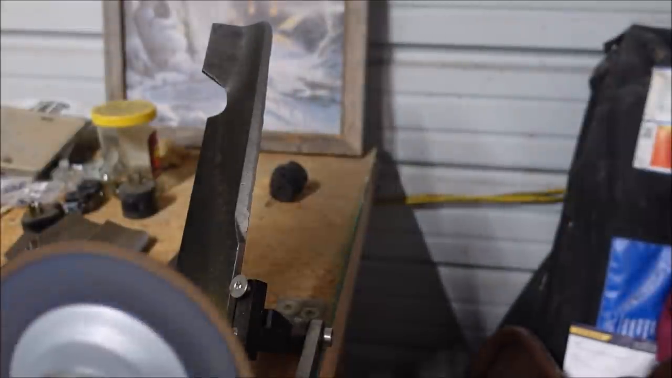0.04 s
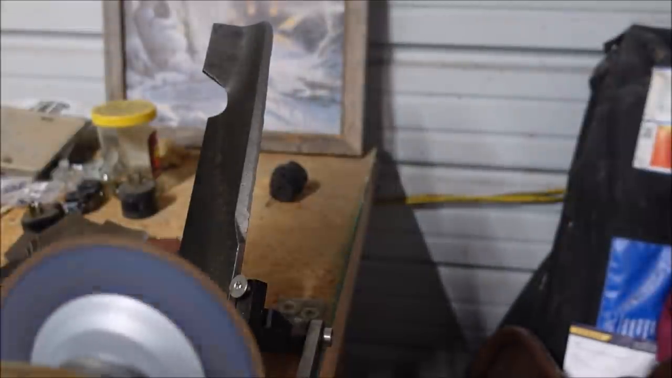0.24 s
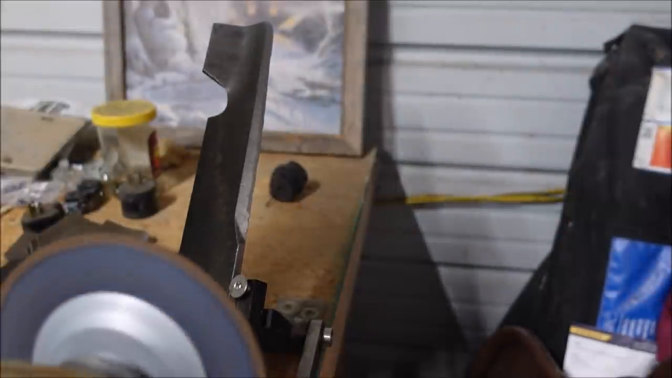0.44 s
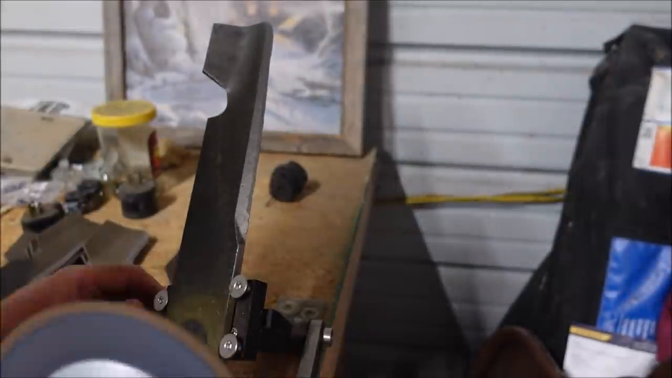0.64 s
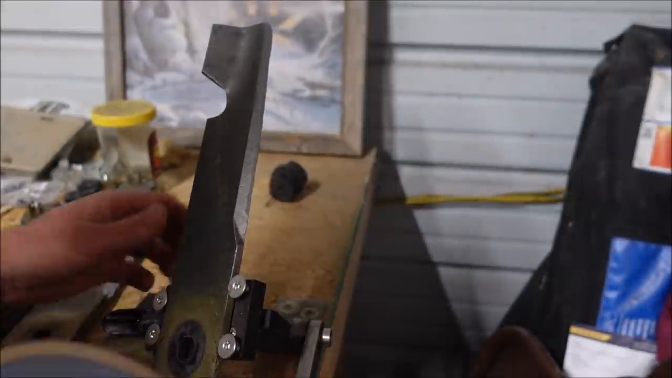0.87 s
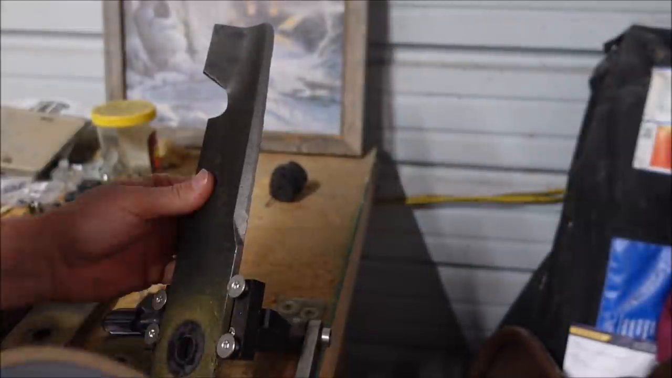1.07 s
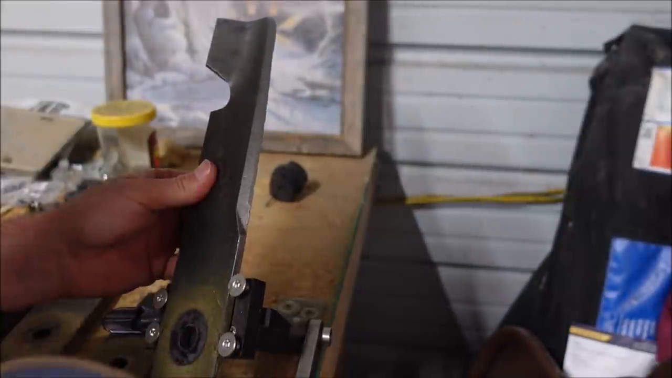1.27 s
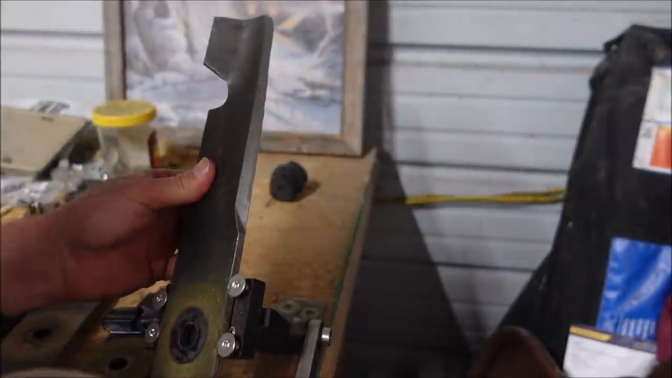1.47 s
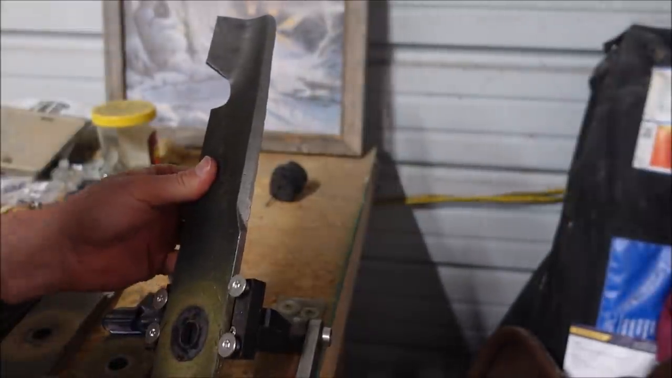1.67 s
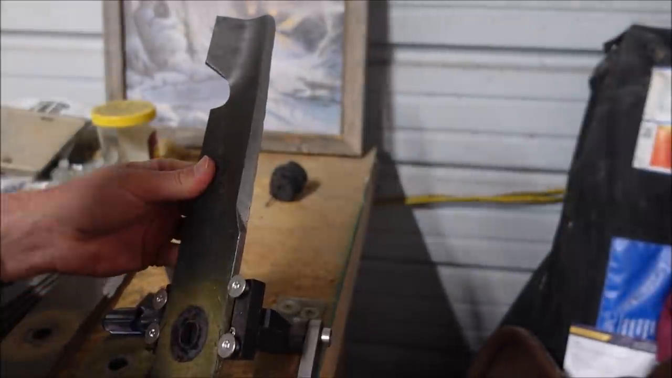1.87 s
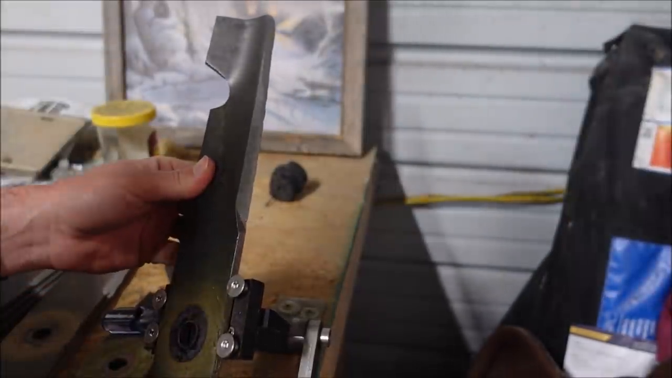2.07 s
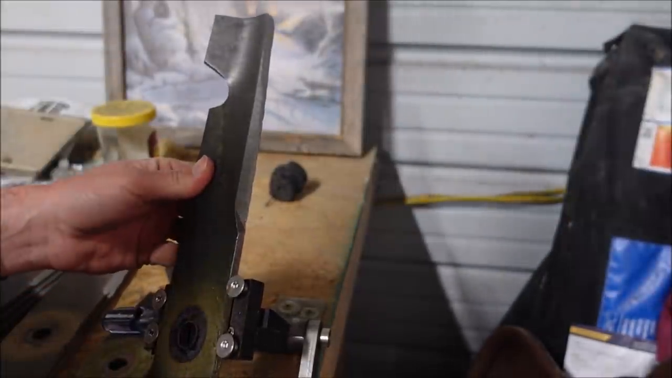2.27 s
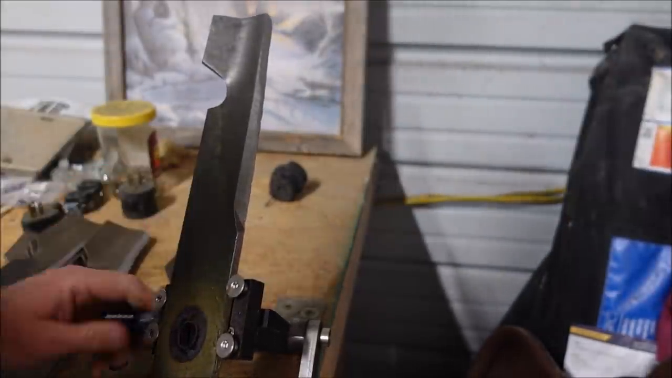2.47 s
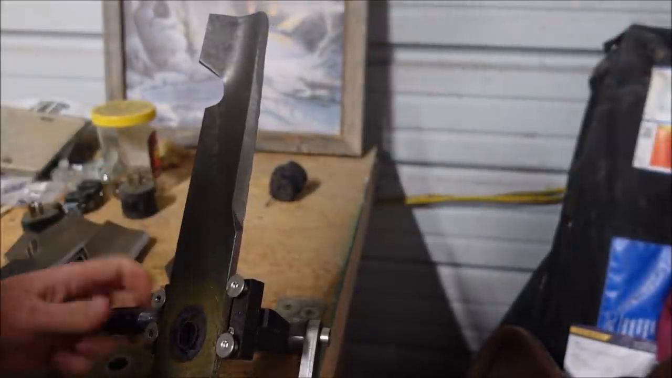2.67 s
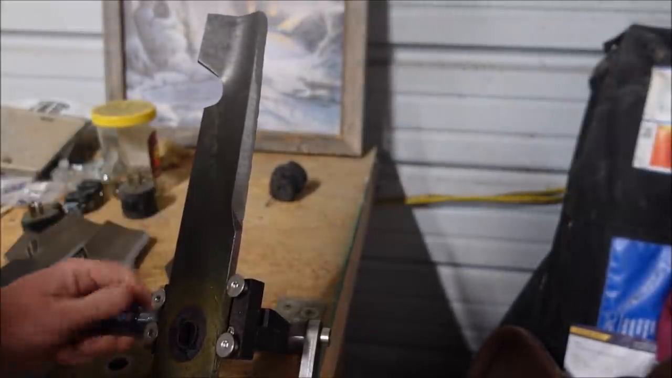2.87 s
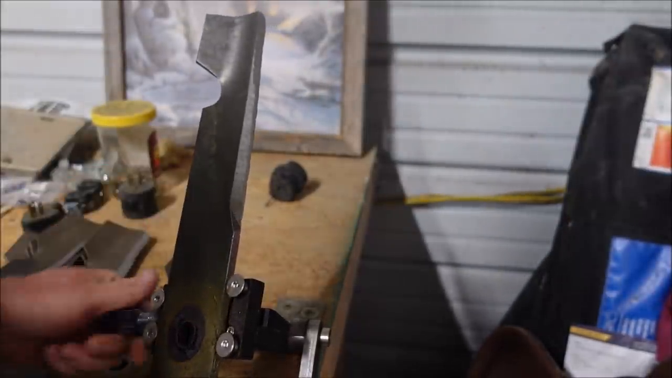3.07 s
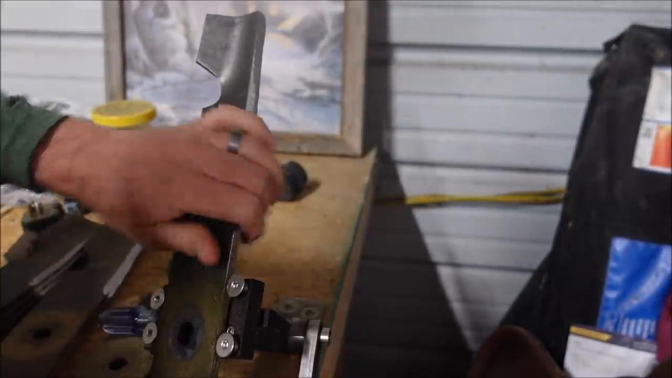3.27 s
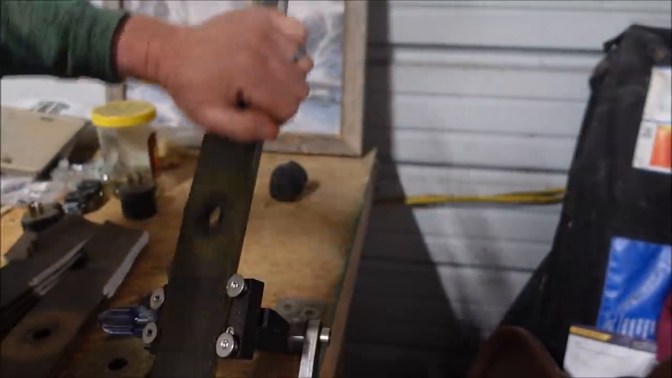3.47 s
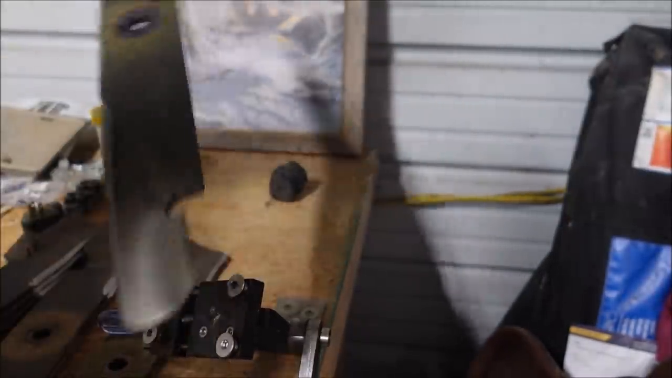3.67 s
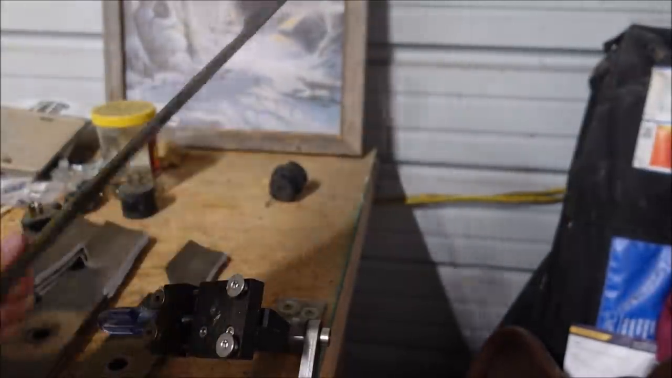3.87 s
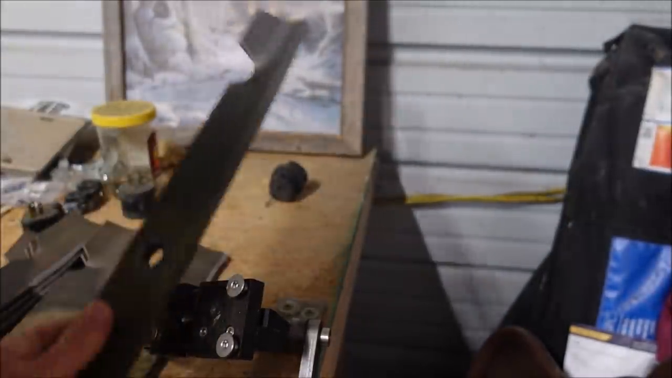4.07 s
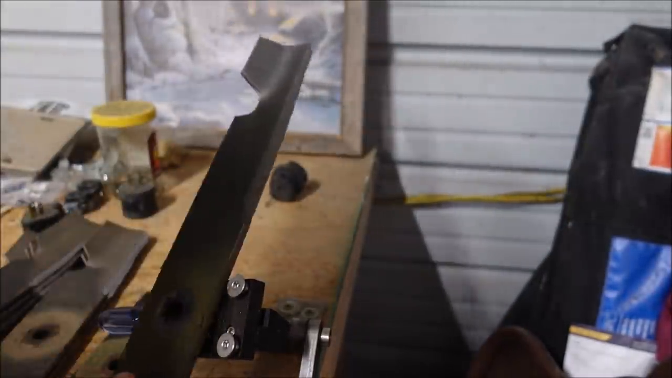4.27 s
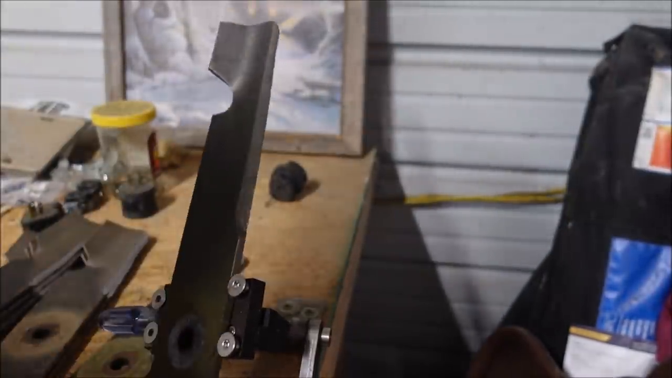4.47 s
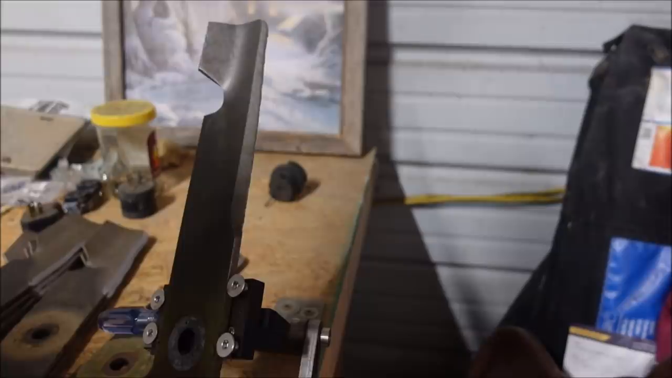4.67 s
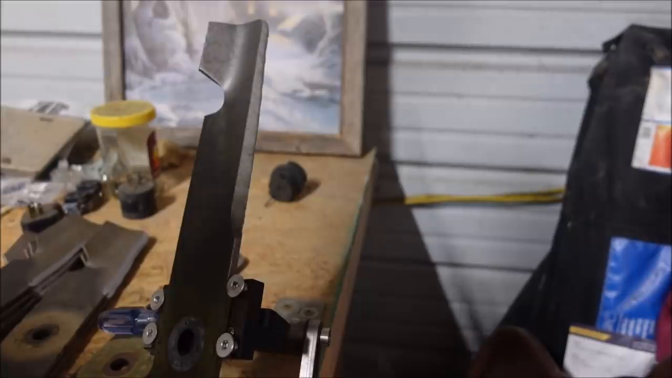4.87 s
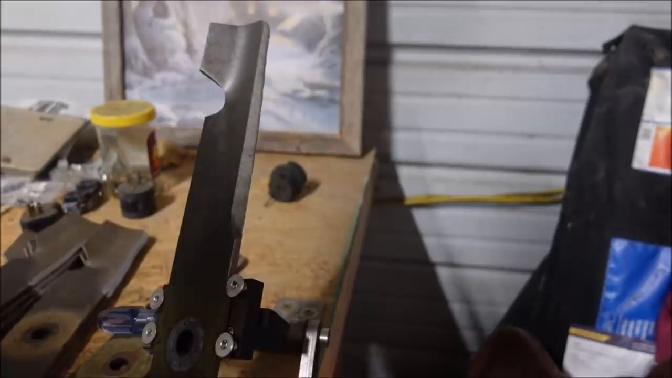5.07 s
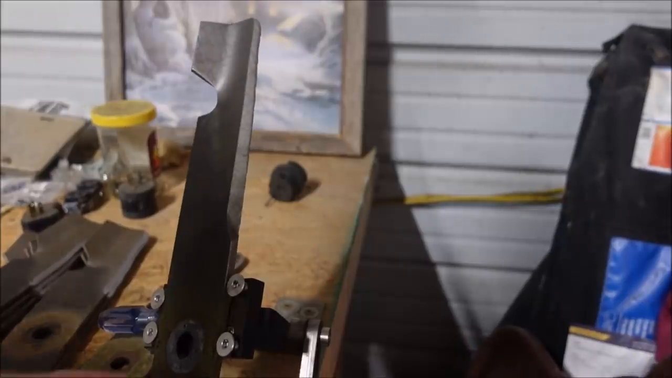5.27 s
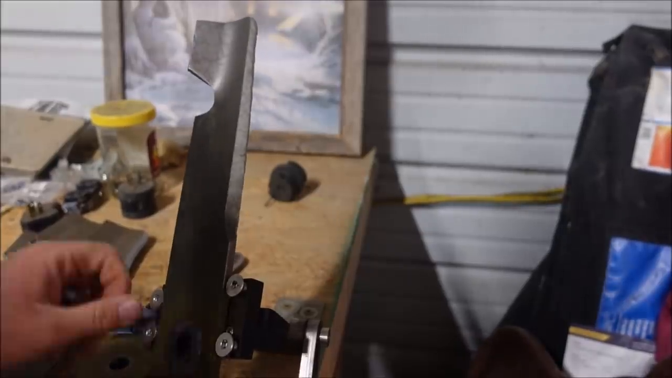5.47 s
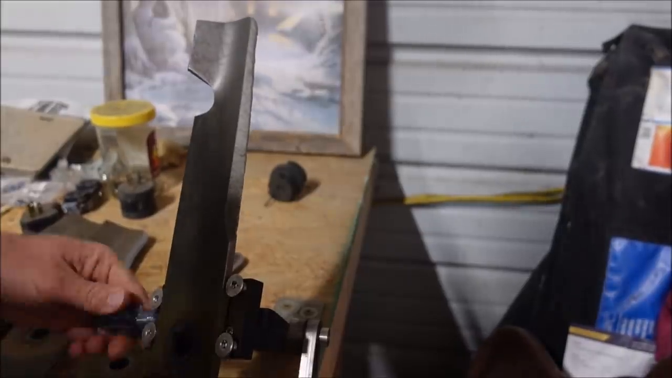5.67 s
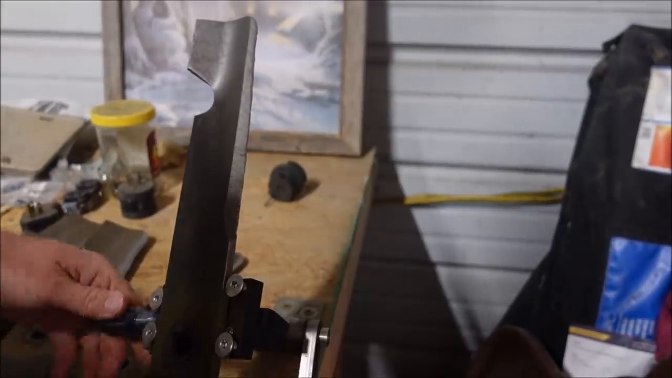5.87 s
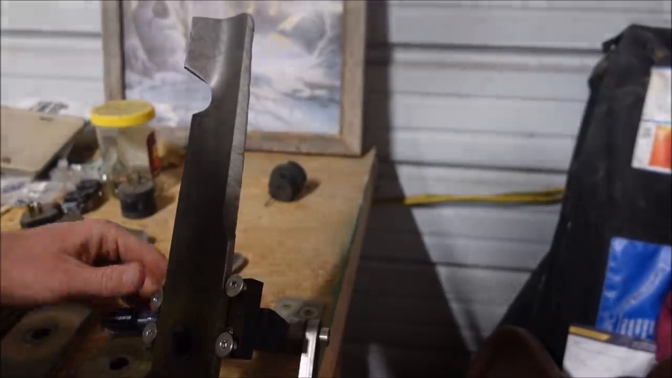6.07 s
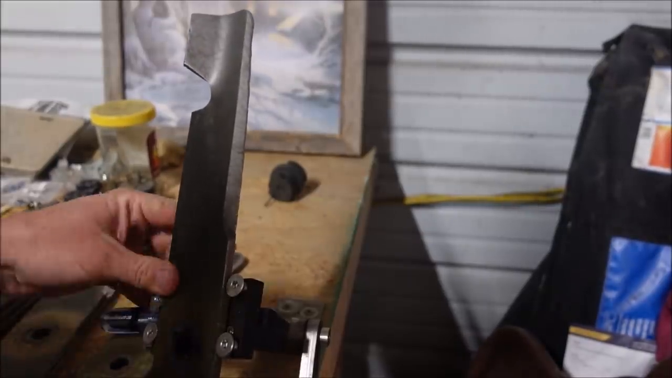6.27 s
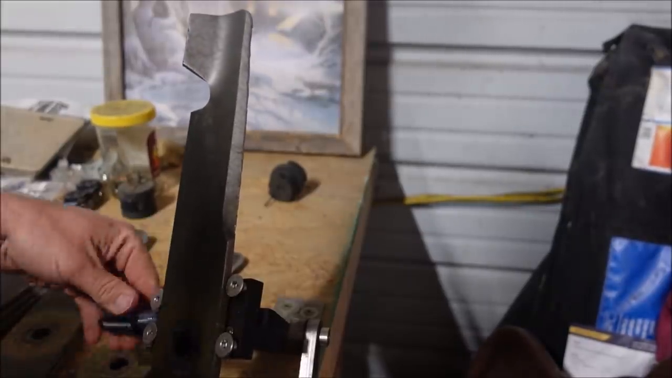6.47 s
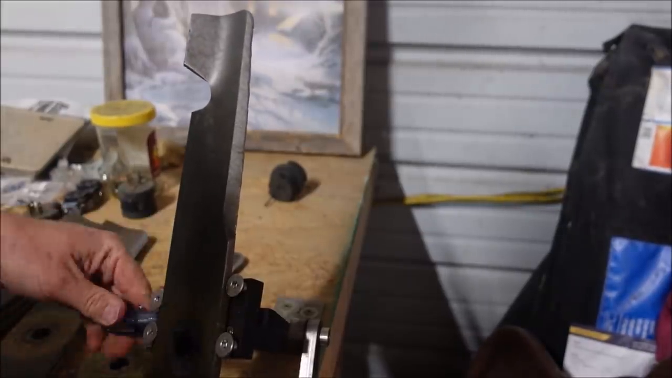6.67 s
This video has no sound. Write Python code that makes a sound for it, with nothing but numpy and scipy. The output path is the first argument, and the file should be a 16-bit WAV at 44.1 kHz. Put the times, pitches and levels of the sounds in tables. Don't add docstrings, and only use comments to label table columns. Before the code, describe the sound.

Power tool hiss sinks into chattering gear rattle and stops; small knob clicks, scraping steel, sharp ringing knocks and faint squeaky tightening follow.

```python
import sys
import numpy as np
from scipy import signal
from scipy.fft import rfft, irfft, next_fast_len
from scipy.io import wavfile
from scipy.ndimage import uniform_filter1d, map_coordinates

SR = 44100
rng = np.random.default_rng(int(sys.argv[2]) if len(sys.argv) > 2 else 0)


def log_audio(samples):
    frames = np.atleast_2d(samples).T
    limited = np.clip(frames, -1, 1)
    pcm = np.round(limited * 32767).astype(np.int16)
    wavfile.write(sys.argv[1], SR, pcm)


def attenuation_scalar(level_db):
    decades = np.asarray(level_db, float) / 20
    return 10 ** decades


N = 296352


def unit(x):
    return x / np.sqrt(np.mean(x ** 2) + 1e-20)


def along(points, hz):
    f, v = np.transpose(points)
    return np.interp(np.log(hz + 1), np.log(f + 1), v)


def curves(rows):
    s, *cols = np.transpose(rows)
    return [np.interp(np.arange(N) / SR, s, c) for c in cols]


def wobble(rate):
    knots = rng.standard_normal(int(N * rate / SR) + 4)
    return map_coordinates(knots, [np.arange(N) * rate / SR])


def filtered(x, response):
    m = next_fast_len(N + SR // 4, real=True)
    return irfft(rfft(x, m) * response(np.fft.rfftfreq(m, 1 / SR)), m)[..., :N]


def modes(table):
    def response(f):
        total = 0
        for k, (center, width, db) in enumerate(table):
            total = total + (-1) ** k * attenuation_scalar(db) * 1j * f * width / (center * center - f * f + 1j * f * width)
        return total
    return response


# (frequency [Hz], likeness [0 to 1])
LIKENESS = [(60, .99), (550, .995), (1650, .96), (4970, .8), (15000, .7)]


def widened(pair, gain):
    def mid_and_side(hz):
        angle = np.arccos(np.clip(along(LIKENESS, hz), -1, 1)) / 2
        return gain(hz) * np.array([np.cos(angle), np.sin(angle)])
    mid, side = filtered(pair, mid_and_side)
    return np.array([mid + side, mid - side])


def rush(gain, patchy_db):
    z = signal.stft(rng.standard_normal((2, N)), nperseg=512)[2]
    patches = uniform_filter1d(rng.standard_normal(z.shape[1:]), size=5, axis=0)
    patches = uniform_filter1d(patches, size=10, axis=1)
    noise = signal.istft(z * attenuation_scalar(patchy_db * unit(patches)), nperseg=512)[1][:, :N]
    return unit(widened(noise, gain))


# (time [s], level [dB])
COAST = [(0, -16.5), (.72, -17.5), (.9, -22.5), (1.15, -24.5), (1.45, -23.5), (1.7, -21), (1.95, -24),
         (2.1, -31), (2.22, -37.5), (2.3, -52.5), (2.45, -82.5)]
# (center [s], level [dB], half length [ms],
# guard ring [dB])
RATTLE = [(0.6887, -18, 1.8, -5), (0.6984, -16.1, 2, -6), (0.7051, -19.5, 2, -6.5),
          (0.7137, -21, 2.5, -4.5), (0.7294, -16.5, 1.2, -8.5), (0.7365, -13, 1.4, 2),
          (0.755, -16.5, 4.9, -3), (0.7862, -17.5, 2.2, -7), (0.7989, -19.5, 2.4, -13.5),
          (0.8168, -13.5, 6.4, -4), (0.8339, -18.5, 1.9, -10.5), (0.8502, -19.5, 2.1, -3.5),
          (0.8602, -12.5, 1.2, -7.5), (0.866, -13, 2.6, -3), (0.8785, -18.5, 1.5, -8),
          (0.8956, -14.5, 1.8, -7.5), (0.9132, -11, 3.1, -5.5), (0.9262, -26.5, 2.7, -11),
          (0.9355, -22, 1.6, -8), (0.9445, -16.5, 1.3, 2.5), (0.96, -13, 3, -3), (0.9758, -22.5, 1.3, -7),
          (0.984, -20.5, 1.7, -5), (0.9964, -16.5, 8.2, -2), (1.0242, -15.5, 2.3, 0),
          (1.034, -12.5, 3.1, -8.5), (1.0494, -24, 1.47, -10.5), (1.0666, -17, 2.6, -0.5),
          (1.0773, -14.5, 3.8, -4.5), (1.1025, -15.1, 2.4, -0.1), (1.1107, -13, 3.7, -5.5),
          (1.1259, -19.5, 1.7, -5.5), (1.137, -13.5, 5, -7), (1.1488, -16, 2.34, -2),
          (1.159, -14, 3.5, -9.5), (1.1819, -17, 1.2, 0), (1.191, -15.5, 5.6, -3), (1.2117, -16, 2.6, -2.5),
          (1.22, -12, 5, -5.5), (1.2385, -25, 1.42, -4), (1.249, -14, 4.8, -2.5), (1.2635, -17, 4.5, -1),
          (1.275, -14.5, 4.1, -0.5), (1.291, -21, 1.5, -1.5), (1.299, -13.5, 2.84, 2),
          (1.3264, -14.5, 4.1, -2), (1.347, -14, 2.1, -1), (1.357, -14, 3.7, -2.5),
          (1.378, -14, 3.2, -9), (1.39, -14, 4.6, -4), (1.4067, -16.5, 4.1, 1),
               (1.4213, -15.5, 4.0, -5), (1.4362, -18, 3.9, 5), (1.457, -16, 5.1, 0.3),
               (1.4693, -13.5, 3.8, -4), (1.4884, -14, 3.6, -8), (1.506, -18, 3.3, -4),
               (1.521, -14.5, 5.6, 1), (1.5404, -12.5, 2.7, -9), (1.548, -21, 2.2, 6),
               (1.5568, -15, 3.1, 2), (1.5673, -19, 1.5, -7.5), (1.578, -14.5, 3.6, 0),
               (1.595, -14, 2.9, -6), (1.615, -17, 3.7, 0.5), (1.64, -13.5, 4.3, -12),
               (1.655, -12, 1.4, -4), (1.6854, -12.5, 1.5, -12), (1.7053, -22, 3.2, -6),
               (1.7128, -21, 3.3, -5), (1.7263, -19, 2.9, -1), (1.745, -14, 2.3, -2),
               (1.7545, -13.5, 2.0, 1), (1.774, -13, 1.9, -1), (1.7924, -18.5, 2.4, -5),
               (1.8054, -20, 3.0, -4), (1.815, -18.5, 2.7, -2), (1.834, -19, 1.7, 0),
               (1.8469, -18.5, 3.8, -11), (1.863, -18.5, 2.3, 1), (1.884, -16, 1.5, -2.5),
               (1.904, -23, 5.4, 5), (1.9167, -19, 2.0, -4), (1.9315, -19.5, 2.5, -2),
               (1.9518, -20, 4.2, -5.5), (1.9746, -25, 3.5, 2), (1.985, -19.5, 1.6, -4.5),
               (2.0084, -22.5, 2.0, 2), (2.0274, -23, 4, 1), (2.067, -21.5, 6.5, -1),
               (2.133, -28, 8.2, 2.5), (2.1675, -31, 4.3, -5), (2.202, -31, 4.9, -9),
               (2.2441, -33.5, 7.1, -7), (2.2826, -44.5, 2.5, -4), (2.2937, -42, 2.0, -11.5)]
# (frequency [Hz], level [dB per Hz])
GEARS_FAST = [(880, -49.5), (1500, -13), (1660, -9.5), (2800, -1.5), (3550, -2), (4330, 2.5), (5940, -2),
              (7100, 0.5), (8200, -3), (9500, -3), (11800, -4), (14000, -13), (16000, -12.5)]
# (frequency [Hz], level [dB per Hz])
GEARS_SLOW = [(880, -61), (1500, -23.5), (2410, -8.5), (2610, -9), (3150, -10), (4640, -3), (7840, -6),
              (9560, -6), (10800, -9.5), (12600, -11), (13900, -17), (16000, -21.5)]
# (frequency [Hz], level [dB per Hz])
CASING = [(59, -85.5), (100, -54), (233, -37.5), (413, -32), (605, -13.5), (794, -9.5), (1180, -6.5),
          (1700, -8), (2600, -10.5), (3380, -31.5), (5720, -120)]
# (frequency [Hz], width [Hz], level [dB])
HOUSING = [(620, 180, -7), (1334, 110, -0.5), (1760, 63.8, -0.5), (2664, 270, 2.5)]


def grinder():
    t, hiss_db = np.arange(N) / SR, curves(COAST)[0]
    sinking_db = np.minimum(hiss_db + 24.5, 0)

    shaft_hz = np.maximum((219.5 + 80) * np.exp(-0.541 * t) - 80, 0)
    turns = 2 * np.pi * np.cumsum(shaft_hz) / SR
    throb = attenuation_scalar(0.61 * wobble(400) + 0.31 * wobble(30))
    beat = attenuation_scalar(3 * np.clip((0.85 - t) / 0.15, 0.3, 1) * np.cos(turns - 1.2))

    clash, clang, near = np.zeros(N), np.zeros(N), np.arange(-800, 800)
    for s, db, half_ms, ring_db in RATTLE:
        bump = attenuation_scalar(2 * db - 7.5) * np.exp(-(near / SR * 1000 / half_ms) ** 2 / 0.53)
        clash[round(s * SR) + near] += bump
        clang[round(s * SR) + near] += attenuation_scalar(2 * ring_db) * bump
    chatter = attenuation_scalar(1.2 * np.clip(wobble(1600), 0, 1.7) ** 2 + 0.5 * wobble(500))

    slow = np.clip((t - 0.6) / 0.96, 0, 1)
    fast_hiss = rush(lambda hz: attenuation_scalar(along(GEARS_FAST, hz)), patchy_db=1.52)
    slow_hiss = rush(lambda hz: attenuation_scalar(along(GEARS_SLOW, hz)), patchy_db=1.52)
    hiss = np.sqrt(1 - slow) * fast_hiss + np.sqrt(slow) * slow_hiss
    hiss = hiss + (beat - 1) * filtered(hiss, lambda hz: 1 / (1 + (4540 / (hz + 1)) ** 6))

    guard_hz = 9400 + 110 * t
    guard_db = -9.5 + 1 * (t > 1) - 25.5 * np.exp(-((t - 1) / 0.29) ** 2) + 0.9 * sinking_db
    swing = rush(lambda hz: 1 / (1 + (hz / 520) ** 2), patchy_db=1)
    guard = np.sqrt(2) * swing * np.sin(2 * np.pi * np.cumsum(guard_hz) / SR)

    hum_db = -42.5 + 7.5 * np.clip((t - 0.38) / 0.65, 0, 1) + 0.69 * sinking_db
    hum = np.sqrt(throb) * rush(lambda hz: attenuation_scalar(along(CASING, hz)), patchy_db=2.0)
    housing = rush(lambda hz: np.abs(modes(HOUSING)(hz)) ** 2, patchy_db=4.0)
    housing_gain = slow * attenuation_scalar(-1.5 + 0.45 * np.minimum(hiss_db + 36, 0))
    hum = hum * attenuation_scalar(0.5 - 12.5 * slow) + housing_gain * housing

    steady = attenuation_scalar(hiss_db - 1.0) * throb
    gears = np.hypot(steady, np.sqrt(clash) * chatter) * hiss
    gears = gears + np.hypot(steady * beat * attenuation_scalar(guard_db), np.sqrt(clang * chatter)) * guard
    running = t < COAST[-1][0]
    return running * (gears + attenuation_scalar(hum_db + 1.5) * (hum + whine(shaft_hz, turns)))


# (multiple of shaft speed, level over the casing hum [dB])
SHAFT_ORDERS = [(2, 2), (2.6, 1), (3, 5), (4, 6), (5, 4), (6, 0), (7, 1), (8, 1), (9, 3)]


def whine(shaft_hz, turns):
    run = slice(0, 2 * SR)
    speed = shaft_hz[run]
    angle = (turns + 0.055 * wobble(25))[run]
    tones = 0
    for k, db in SHAFT_ORDERS:
        hz = k * speed
        vents = 1 / (1 + (330 / hz) ** 4) / (1 + (hz / 1000) ** 4)
        tones = tones + attenuation_scalar(db + along(CASING, hz) + 2.6 * wobble(14)[run]) * vents * np.sin(k * angle)
    fade = ((speed - shaft_hz[2 * SR]) / shaft_hz[0]) ** 0.75
    return np.pad(tones * fade * attenuation_scalar(3.5), (0, N - 2 * SR))


BLADE_HZ = [2360, 3500, 3770, 4680, 5000, 5780, 6420, 7450, 8880, 9430, 10250, 11800, 12420, 13700]
# (width [Hz], level [dB] while clamped, pried loose, dragged out, turned over, set down, knocked home)
BLADE_GRIPS = [(32.1, 6, -21.5, -3.5, -18.5, 0, -6.5), (66, -27, -14, -23.5, -24, -19, -16),
               (35.06, -22, -7.5, -22.5, -14, 2.5, -20.5), (50, -13, -1.5, -3, 5, -22, -7),
               (52.8, -9, -14, -9, -7, 0, -4.5), (55.06, 6, -19, -4.5, -16, -4.5, -5.5),
               (80, 8, -3.5, -0.5, -4, -2, -2.5), (39, 8, -13.5, -4, 5, -10.5, -5.5),
               (40.3, 10.5, 8, 0, -9.5, -10.5, -6.5), (25, -23, -15.5, -10, -5, -22, -22),
               (35, -22, -5.5, -11.5, -2, -8.5, -13), (35, -18, -5.5, -11, -10, -11, -9),
               (40, -22, -12, -11.5, -9, -22.5, -14), (45, -21.5, -19, -16, -1.5, -17, -19)]
GRIP_CHANGES = [3.3, 3.46, 3.85, 4.15, 4.36]
GRIP_WIDENS = [1.2, .7, 1.5, .8, .55, .9]
# (frequency [Hz], width [Hz], level [dB])
BENCH = [(691, 246, 2.5), (1102, 210, 1), (1328, 83, 4), (1850, 510, -4.5)]


def contact(scrape, thud, fizz, ring, snap):
    steel = rush(lambda hz: 1 / (1 + (1700 / (hz + 1)) ** 4) / (1 + (hz / 7000) ** 4), patchy_db=2)
    grit = rush(lambda hz: 1 / (1 + (5500 / (hz + 1)) ** 6) / (1 + (hz / 10000) ** 3), patchy_db=5.0)
    bright = rush(lambda hz: 1 / (1 + (9000 / (hz + 1)) ** 4), patchy_db=-2.0)
    force = rush(lambda hz: 1 + 0 * hz, patchy_db=2.5)

    bench = filtered(thud * force, lambda hz: modes(BENCH)(hz) * (1j * hz / (1j * hz + 400)) ** 2)
    grip = np.searchsorted(GRIP_CHANGES, np.arange(N) / SR)
    blade = 0
    for k, widens in enumerate(GRIP_WIDENS):
        width_and_db = np.array(BLADE_GRIPS)[:, [0, 1 + k]] * [widens, 1]
        blade = blade + filtered((grip == k) * ring * force, modes(np.c_[BLADE_HZ, width_and_db]))
    return snap * bright + scrape * steel + fizz * grit + attenuation_scalar(23.0) * bench + attenuation_scalar(22.5) * blade


def bursts(starts, gains, rise, t60s):
    env, t = np.zeros((gains.shape[1], N + SR)), np.arange(SR // 6) / SR
    for s, gain, t60 in zip(starts, gains, t60s):
        shape = (1 - np.exp(-t / rise)) * attenuation_scalar(-60 * t / t60)
        env[:, round(s * SR):][:, :len(t)] += np.outer(gain, shape)
    return env[:, :N]


# (time [s], peak [dB], thud [dB], fizz [dB])
LOOSEN = [(2.3312, -40, -2, -14), (2.639, -35, -13, 7.5), (2.641, -29, -18, 8), (2.6616, -40.5, -8.5, -18),
          (2.696, -49.5, 0, -8), (2.7926, -36.5, -11, 9), (2.844, -28.5, -19, 2), (2.885, -32.5, -18, 0),
          (2.942, -42.5, -10, -23.5), (2.99, -31.5, -12.5, 13), (3.011, -32, -10.5, -6),
          (3.111, -33, -13.5, 9), (3.124, -45, -2, -2)]
# (time [s], peak [dB], thud [dB], fizz [dB])
LIFT = [(3.365, -33.5, -21, 18.5), (3.3857, -32.5, -29, 14.5), (3.396, -33, -19, 9), (3.442, -30, -7, -12),
        (3.4938, -43.5, -9, -9), (3.51, -29.5, -10, -1), (3.527, -31, -20, 1.5), (3.548, -34, -13, -12),
        (3.5834, -20.5, -8.5, -6)]
# (time [s], peak [dB], thud [dB], fizz [dB])
SEAT = [(4.244, -12, -17.5, 0), (4.254, -20.5, -10.5, -15.5), (4.275, -27, -14.5, -19.5),
        (4.3, -29, -10, -17), (4.386, -27.5, -18.5, -8.5), (4.3955, -34.5, -20, -9),
        (4.4345, -12.5, -11, -7.5), (4.449, -14.5, -12, -4.5), (4.452, -20.5, -10.5, -3.5),
        (4.482, -35.5, -8, -13), (4.5324, -16.5, -4, -5), (4.536, -24.5, -9, -6), (4.586, -42, -5, -13)]
# (time [s], peak [dB], thud [dB], fizz [dB])
TIGHTEN = [(4.630, -29, -26, 0.5), (4.6674, -41, -10, 9), (4.7472, -34.5, -26, 6.5),
           (4.784, -36.5, -22, 4.5), (4.849, -48.5, -5.5, 17.5), (4.939, -45, -13, 13),
           (4.949, -20, -11, -8.5), (5.108, -53.5, -25, 6), (5.135, -40.5, -38, 3), (5.188, -45, -17, 2),
           (5.2674, -52, -1, -8), (5.301, -42.5, -1, -12), (5.354, -67.5, 18, -8),
           (5.4002, -37, -15.5, -32), (5.4214, -38.5, -13, -6), (6.0624, -38, -16, 3.5),
           (6.073, -40.5, -11, -8), (6.0847, -47, -3, 10), (6.1818, -46.5, -9, -21),
           (6.289, -48.5, -16, -21.5)]
RING_DB = [-21, -1, -3, -13]
# (time to die by 60 dB [s], crack [dB])
TOUCH = [
    (0.05, -2.5),
    (0.096, -7),
    (0.052, -0.5),
    (0.05, 2.5),
]


def knocks():
    force = 0
    for table, ring_db, (t60, crack_db) in zip((LOOSEN, LIFT, SEAT, TIGHTEN), RING_DB, TOUCH):
        s, db, thud_db, fizz_db = np.transpose(table)
        ringing_db = ring_db + np.maximum(fizz_db, 0)
        snap_db = 7 + np.maximum(fizz_db, -6)
        gains = attenuation_scalar(db - 8.0 + np.array([0 * db, thud_db, fizz_db, ringing_db, snap_db])).T
        t60s = np.clip(t60 * attenuation_scalar(-0.17 * fizz_db), 0.02, 0.09)
        force = force + bursts(s, gains * [1, 1, 1, 1, 0], 0.001, t60s)
        force = force + attenuation_scalar(crack_db) * bursts(s, gains, 0.0002, 0.0031 + 0 * s)
    return force


# (start [s], peak time [s], end [s], peak [dB], thud [dB])
DRAGS = [
    (3.47, 3.495, 3.55, -31.5, -10),
    (3.498, 3.565, 3.61, -22, -18),
]
# (start [s], peak time [s], end [s], peak [dB], thud [dB])
CLANK = [
    (3.6217, 3.631, 3.6724, -21.5, -18.5),
]
# (start [s], peak time [s], end [s], peak [dB], thud [dB])
RUBS = [
    (3.95, 3.985, 4.4, -65, -27),
    (4.004, 4.025, 4.1, -64.5, -32),
    (5.076, 5.148, 5.37, -54, -15.5),
]
# (start [s], peak time [s], end [s], peak [dB], thud [dB])
FUMBLES = [
    (6.025, 6.075, 6.25, -58.5, -9),
    (6.151, 6.299, 6.6, -68, -16.5),
    (6.573, 6.712, 6.75, -67, -14.5),
]
# (fall to its ends [dB], fizz [dB], blade ring [dB])
STROKE = [
    (21.8, -9.5, -14.5),
    (0.4006, 1.5, 1.5),
    (15.4, 8, -6),
    (13, -10, 3),
]


def slides():
    force = np.zeros((5, N))
    for table, (fall_db, fizz_db, ring_db) in zip((DRAGS, CLANK, RUBS, FUMBLES), STROKE):
        for start, peak, end, db, thud_db in table:
            n = np.arange(round(start * SR), min(round(end * SR), N))
            touch = np.clip(np.minimum(n / SR - start, end - n / SR) / 0.003, 0, 1)
            swell = touch * attenuation_scalar(db - fall_db * np.interp(n / SR, [start, peak, end], [1, 0, 1]))
            force[:4, n] += np.outer(attenuation_scalar([0, thud_db, fizz_db, ring_db]), swell)
    return force * attenuation_scalar(0.78 * wobble(300) + 0.76 * wobble(76) - 4.5)


# (time [s], length [s], start pitch [Hz], end pitch [Hz], level [dB])
SQUEAKS = [(2.329, 0.027, 690, 718, -56), (3.161, 0.17, 8850, 8800, -66), (3.992, 0.065, 13600, 13600, -64),
           (4.016, 0.051, 10200, 10050, -59), (5.655, .1, 3020, 3060, -75), (5.769, 0.059, 2320, 2290, -75),
           (6.096, 0.13, 5760, 5800, -66), (6.31, 0.075, 1133, 1187, -72), (6.382, 0.043, 1693, 1730, -75),
           (3.91, 0.061, 10400, 10400, -64), (3.973, 0.052, 7440, 7500, -59.5),
           (3.975, 0.064, 4960, 4960, -64), (4.023, 0.045, 4660, 4670, -57),
           (3.965, .04, 14500, 14400, -66), (4.02, .04, 15100, 15000, -67), (4.02, .04, 8280, 8300, -62.5),
           (4.04, 0.14, 3700, 3670, -73.5), (5.418, 0.14, 6380, 6470, -67.5),
           (5.516, 0.085, 2590, 2555, -66.5), (5.552, 0.06, 1720, 1720, -66.5),
           (5.65, 0.041, 5400, 5460, -67), (5.651, 0.029, 3900, 3910, -71),
           (5.758, 0.045, 4600, 4500, -68.5), (6.282, 0.051, 6520, 6640, -71),
           (6.423, 0.069, 7980, 8730, -73), (6.441, 0.19, 8740, 8780, -71), (6.662, 0.047, 3870, 3870, -66),
           (6.667, 0.068, 4470, 4520, -69.5), (6.672, 0.11, 1924, 1850, -70.5)]


def squeaks():
    out, drift = np.zeros(N + SR), np.pad(1.1 * wobble(200), (0, SR))
    for s, length, start_hz, end_hz, db in SQUEAKS:
        u = np.linspace(0, 1, round(length * SR))
        swell = np.sqrt(u * np.e * 4 * np.exp(-4 * u)) * np.sqrt(1 - u)
        at = slice(round(s * SR), round(s * SR) + len(u))
        angle = 2 * np.pi * np.cumsum(start_hz + (end_hz - start_hz) * u) / SR
        out[at] += attenuation_scalar(db) * swell * np.sin(angle + drift[at])
    return attenuation_scalar(7.0 + 2.5 * wobble(120)) * out[:N]


# (frequency [Hz], time to die by 60 dB [s])
SHED = [(400, 0.34), (3000, 0.37), (12000, 0.27)]


def shed(x):
    hz, t, z = signal.stft(rng.standard_normal((2, SR // 2)), SR, nperseg=256)
    tail = signal.istft(z * attenuation_scalar(-60 * t / along(SHED, hz)[:, None]), SR, nperseg=256)[1]
    late = np.pad(x.mean(axis=0), (200, 0))[None]
    wet = signal.fftconvolve(late, tail / np.linalg.norm(tail[0]), axes=1)[:, :N]
    return widened(wet * attenuation_scalar([[0], [4]]), lambda hz: 1)


# (time [s], level [dB])
RUSTLE = [(2.3, -68.5), (2.6, -66), (3.3, -70), (3.85, -56.5), (4.2, -69), (4.9, -62), (5.5, -69.5),
          (6.0, -72.5), (6.72, -71.5)]
# (frequency [Hz], level [dB per Hz])
FAR_MACHINES = [(24, -72), (40, -43.5), (232, -19.5), (267, -21.5), (1190, -10.5), (1550, -11.5),
                (1780, -8.5), (3140, -8), (5000, -11), (6500, -41), (11000, -120)]
# (frequency [Hz], level [dB per Hz])
HISS = [(1500, -32.5), (3000, -10), (6000, 4), (10000, -1.5), (16000, -6)]


def air():
    rustle_db, = curves(RUSTLE)
    far_db = -69 + 0.28 * (rustle_db - rustle_db.mean())
    far = attenuation_scalar(far_db) * rush(lambda hz: attenuation_scalar(along(FAR_MACHINES, hz)), patchy_db=1.3)
    return far + attenuation_scalar(rustle_db) * rush(lambda hz: attenuation_scalar(along(HISS, hz)), patchy_db=0.8)


# (time [s], left minus right [dB])
LEAN = [(0, 1), (1.7, 1.3), (2.6, .5), (3.2, -1), (3.7, .9), (4.6, .3), (5.2, 1.3), (5.7, 0), (6.72, 0)]


def scene():
    tool = grinder()
    hands = contact(*(knocks() + slides())) + squeaks()
    lean = curves(LEAN)[0] / 2
    near = (tool + hands) * attenuation_scalar([lean, -lean]) + shed(attenuation_scalar(-15) * tool + attenuation_scalar(-8.0) * hands)
    near = near / (1 + np.abs(near / 0.8) ** 6) ** (1 / 6)
    return filtered(near, lambda hz: (1j * hz / (1j * hz + 200)) ** 2) + air()


def low_pass(x):
    return signal.sosfilt(signal.butter(12, 16520, fs=SR, output="sos"), x)


def record(dry):
    mix = filtered(dry, lambda hz: 1 / (1 + (hz / 15930) ** 300))
    return low_pass(mix)


dry = scene()
out = record(dry)
log_audio(out)
```